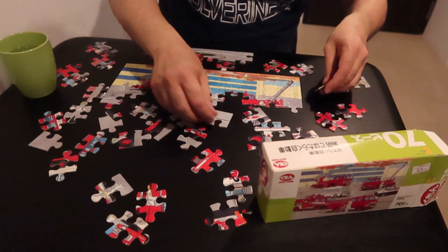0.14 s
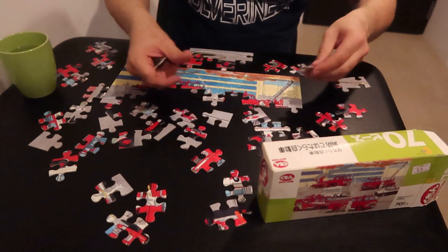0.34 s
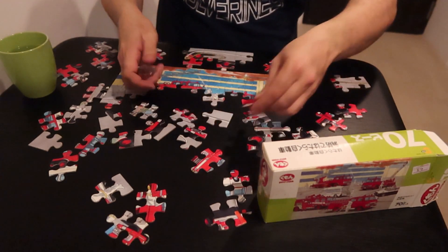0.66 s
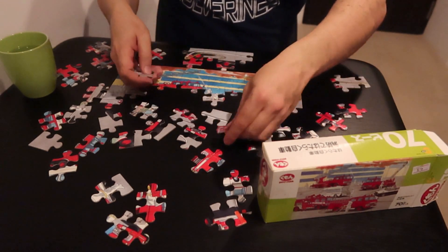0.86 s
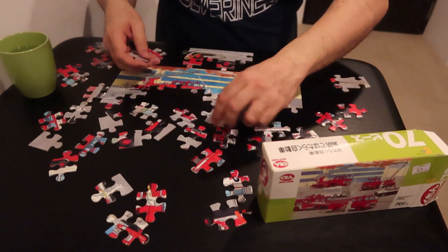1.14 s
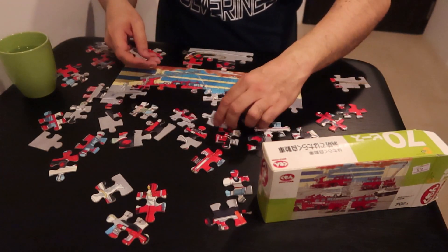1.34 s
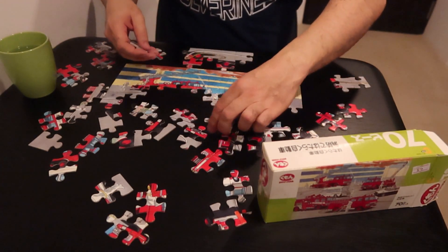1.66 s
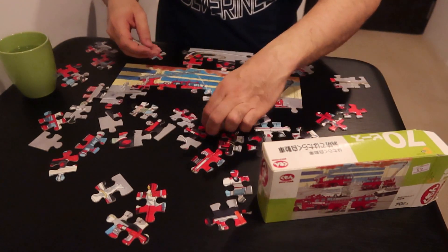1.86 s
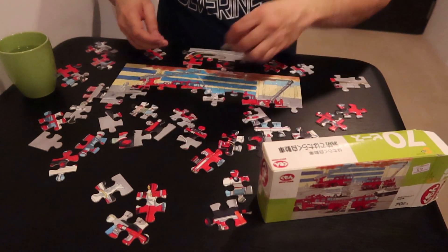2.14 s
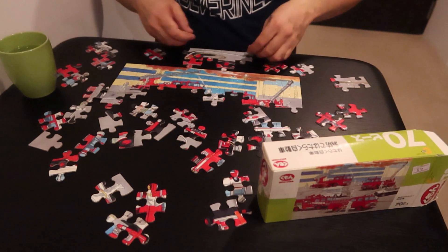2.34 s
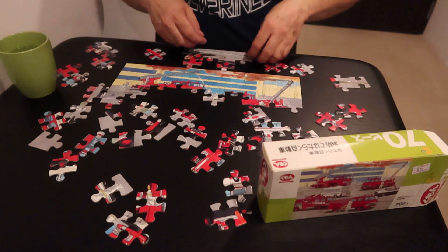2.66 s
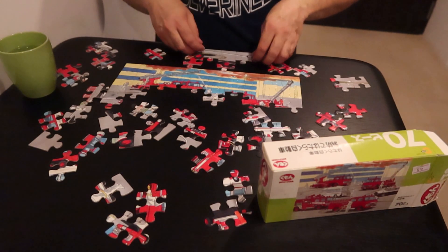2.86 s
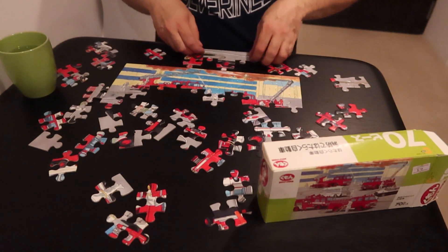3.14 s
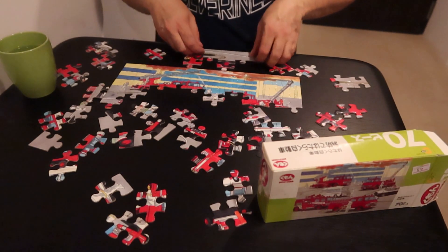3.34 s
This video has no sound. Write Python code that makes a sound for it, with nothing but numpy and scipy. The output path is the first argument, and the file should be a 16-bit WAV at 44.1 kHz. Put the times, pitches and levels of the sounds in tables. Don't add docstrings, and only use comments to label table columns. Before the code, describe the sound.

Cardboard puzzle pieces handled on a hard table: faint taps, a sharp snap, sparse clicks and brief scrapes, then a loudest closing snap; close, nearly mono microphone with light hiss in a small room.

```python
import sys
import numpy as np
from scipy import signal
from scipy.fft import rfft, irfft
from scipy.io import wavfile
from scipy.ndimage import uniform_filter1d

SR = 44100
rng = np.random.default_rng(int(sys.argv[2]) if len(sys.argv) > 2 else 0)


def boost_factor(decibels):
    exponent = np.asarray(decibels, float) / 20
    return 10 ** exponent


def digitize_waveform(pressure):
    field = np.atleast_2d(pressure).T
    bounded = np.clip(field, -1, 1)
    quanta = np.round(bounded * 32767).astype(np.int16)
    wavfile.write(sys.argv[1], SR, quanta)


N = 154350

# (frequency [Hz], level [dB per Hz])
HISS_COLOUR = [(30, -11), (60, -5), (250, -4.5), (520, -9.5), (1000, -9), (1190, -9.5), (1440, -12),
               (15800, -16)]
# (frequency [Hz], level [dB])
SIDE_HISS_COLOUR = [(60, -68), (180, -17.5), (550, -7.5), (1650, -7.5), (4970, -4), (15000, -9.5)]
# (frequency [Hz], width [Hz], rms level [dB])
RUMBLE_BANDS = [(28, 20, -93), (49.3, 20, -77.5), (97.3, 18, -67.5), (134, 41, -69), (174.8, 44, -66),
                (228, 180, -68.5), (357, 214, -70)]
# (time [s], level [dB], pitch [Hz], table thump [dB], table knock [dB])
SOFT_TAPS = [(0.047, -50, 1310, -73, -63), (0.058, -52, 1600, -77, -59), (.109, -57, 2400, -66, -53),
             (0.461, -50.5, 10400, -80, -78), (.51, -53, 3480, -84, -73), (0.9118, -43.5, 2040, -74, -52.5),
             (.968, -56, 1510, -57, -61), (1.3369, -47, 1300, -43.5, -58.5), (1.7035, -48, 1900, -42, -52),
             (1.785, -49.5, 1950, -67, -53), (1.845, -56, 1780, -74, -57), (2.4684, -55, 3300, -80, -48),
             (2.592, -48, 6770, -78, -77), (2.631, -59, 7500, -80, -65), (2.798, -54, 3400, -73, -59),
             (3.115, -49, 1680, -73, -63), (3.311, -46.5, 1940, -75, -51)]
# (frequency [Hz], level [dB], time to fall 60 dB [s])
THUMP_MODES = [(102.7, 2.5, 0.35), (149, -5.5, 0.31), (184, -1, 0.086)]
# (frequency [Hz], level [dB], time to fall 60 dB [s])
KNOCK_MODES = [(283, 2.5, 0.029), (375, 4.5, 0.083), (437, 6, 0.085), (475, 2, 0.11), (630.5, 1.5, 0.092),
               (747, 7.5, 0.052), (793, 5.5, 0.049)]
# (start [s], length [s], level [dB], pitch [Hz], width [Hz])
DRAGS = [(0.082, 0.05, -51.5, 1210, 1490), (0.19, 0.022, -52, 1200, 1500), (0.44, 0.038, -56, 10100, 1500),
         (.43, 0.038, -60.5, 2280, 600), (.49, 0.023, -57, 8950, 4000), (.86, 0.027, -61, 4000, 1200),
         (.855, .04, -60.5, 9500, 2500), (1.424, 0.083, -61, 7500, 5000), (1.778, .055, -51.5, 1020, 1450),
         (1.822, 0.045, -55, 970, 1490), (2.056, 0.03, -50, 4300, 700), (2.064, 0.022, -52, 6730, 700),
         (2.073, 0.022, -49, 950, 300), (2.0743, .018, -51, 1890, 500), (2.066, 0.021, -50, 10200, 5000),
         (2.62, 0.022, -48, 7500, 2570), (3.103, 0.016, -54, 8000, 6000)]
# (time [s], level [dB],
# pitch [Hz], width [Hz])
SHORT_TICKS = [(.0865, -53, 3200, 700), (.1105, -47, 5700, 500), (.112, -53, 4500, 500),
               (.128, -35, 2110, 250), (.1345, -32.5, 1230, 110), (.1345, -32.5, 2160, 400),
               (0.1408, -39, 1090, 300), (.912, -51, 800, 200), (.912, -48, 2300, 700),
               (.918, -48, 850, 350), (1.1056, -38, 3300, 1500), (1.1058, -40, 5600, 2000),
               (1.1085, -34, 1060, 260), (1.338, -52, 915, 300), (1.704, -53, 815, 300),
               (1.704, -55, 1800, 700), (1.7108, -50, 900, 400), (2.4688, -44.5, 1680, 350),
               (2.4695, -42.5, 754, 110), (2.488, -54, 560, 250), (2.5997, -38, 4800, 700),
               (2.5994, -38, 2500, 700), (2.9373, -42, 8000, 5000), (2.9452, -40, 3880, 900),
               (2.946, -41, 9500, 3000), (2.9505, -36.5, 750, 250), (3.3257, -29, 1900, 250),
               (3.326, -32, 448, 75), (3.3262, -23.5, 1474, 200), (3.331, -27, 7100, 1500),
               (3.3365, -34, 1440, 110), (3.3356, -32, 8560, 3000), (3.339, -30, 6500, 2000),
               (3.344, -28, 686, 250)]
# (time [s], thin edge [dB], whole piece [dB])
SLIP_JERKS = [(2.0622, -53, -68), (2.0658, -44, -58), (2.0683, -40, -50), (2.0712, -37, -47),
              (2.0727, -37, -53), (2.0745, -38, -42), (2.076, -36, -33.5), (2.0775, -36, -37.5),
              (2.0786, -35.5, -33.5), (2.0799, -36.5, -37.5), (2.0826, -41, -43), (2.0843, -48, -45)]
# (frequency [Hz], width [Hz], level [dB])
EDGE_RINGS = [(4220, 480, 1), (5370, 600, -2), (6700, 460, -8.5), (7900, 700, -8.5), (11900, 2000, -7.5)]
# (frequency [Hz], width [Hz], level [dB])
BODY_RINGS = [(994, 250, -2), (1900, 460, 0.1), (2870, 460, -4)]
# (time [s], peak [dB], table thump [dB], table knock [dB], chatter length [s])
LOUD_SNAPS = [
    (0.1273, -30, -18.5, -12, 0.0035),
    (1.1021, -32.5, -16, -12.5, .006),
    (2.078, -43, -15, -30, 0.0084),
    (2.599, -30, -39, -27, 0.0069),
    (2.9301, -27, -19, -13, 0.00684),
    (3.3245, -14, -19.5, -19.5, 0.0024),
]
# (frequency [Hz], width [Hz], level [dB])
SNAP_RINGS = [
    [(1230, 52, -2.5), (1860, 260, 4.5), (3390, 160, -4), (4750, 560, 5), (5700, 820, 6), (9170, 530, -4)],
    [(1060, 240, 10), (2120, 1200, 5.5), (3800, 580, -10), (8260, 870, -1), (12600, 540, -6)],
    [(980, 83, 8), (1900, 130, -2), (3870, 460, 1), (5400, 400, 3)],
    [(2270, 130, -3.5), (4800, 170, 0.5), (7500, 500, 8), (9900, 460, -20)],
    [(758, 96, 6), (3780, 420, 1), (6030, 550, 5), (8250, 320, -2), (9500, 800, 2), (12700, 470, -1)],
    [(770, 110, 1), (1620, 230, 6), (3840, 600, 2), (7270, 900, 1.5), (9150, 1450, 8.5), (11300, 2100, 2)],
]
# (frequency [Hz], level [dB per Hz])
SNAP_CRACKS = [
    [(290, -26), (450, -2), (750, -5), (1200, -2), (2300, -7), (7480, -8.5), (14000, -29)],
    [(200, -14), (450, -8), (750, -14), (1100, -3), (1800, -6.5), (3800, -13.5), (5000, -20), (14000, -25)],
    [(350, -36), (800, -12), (1940, -6), (2430, -1), (5180, -13), (15000, -22)],
    [(710, -45), (1200, -16), (2950, -5.5), (4000, -13.5), (7550, -2.5), (15000, -22)],
    [(240, -21), (400, -12.5), (1660, -14), (2400, -14.5), (9660, -16), (15000, -35)],
    [(240, -32), (450, 2.5), (580, -6), (780, -7), (1100, -1.5), (1450, -5), (4200, -1.5), (9500, -0.5),
     (16000, -28)],
]
CRACK_TO_ROOM_DB = [0.32, 0.47, -1, -0.26, 0.5, 0.62]
# (delay [s], level [dB])
FIRST_ECHOES = [(.0064, -9), (0.0106, -12.5), (0.0139, -11.5)]
# (frequency [Hz], time to fall 60 dB [s])
ROOM_DECAY = [(150, 0.6), (500, 0.29), (1500, 0.3), (4000, 0.22), (8000, 0.25), (14000, 0.15)]
# (frequency [Hz], level [dB])
ROOM_TONE = [(200, -2), (800, 0), (14000, 1)]

HISS_DB, HISS_EDGE_HZ = -56.5, 15900
TAP_S, TAP_RISE_S = 0.0045, 0.0004
TAP_WIDTH = 0.45
TAP_LOWER, TAP_LOWER_DB = 0.52, 1.5
THUMP_RISE_S, KNOCK_RISE_S = 0.0033, 0.004
GRIT_PER_S, GRIT_DB = 4000, 2.5
SNAP_RISE_S = 0.000231
CRACK_SHARE = 0.683
CRACK_DIRECT_DB = -0.5
ROOM_DB, ROOM_RISE_S, SIDE_ROOM_DB = -3, 0.0054, -51
ECHO_HZ = 13000
KNOCK_TO_ROOM_DB, TICK_TO_ROOM_DB, SCRAPE_TO_ROOM_DB, RING_TO_ROOM_DB = -3.5, -8.5, -5, -7
LOW_HZ, EDGE_HZ = 62, 16250
OFFSET = 0.0012
PUSH = np.hanning(30) / 15


def evened(x):
    return x / np.sqrt(np.mean(x ** 2) + 1e-20)


def peaked(x, db):
    return boost_factor(db) * x / np.sqrt(uniform_filter1d(x ** 2, size=44).max())


def read(points, hz):
    f, value = np.transpose(points)
    return np.interp(np.log(hz + 1), np.log(f + 1), value)


def add(mix, s, sound):
    part = mix[round(s * SR):][:len(sound)]
    part += sound[:len(part)]


def ring(x, hz, width):
    r = np.exp(-np.pi * width / SR)
    return 2 * signal.lfilter([1 - r], [1, -r * np.exp(2j * np.pi * hz / SR)], x).real


def steep(x, hz, width):
    return ring(ring(x, hz, width), hz, 2 * width)


def ring_set(blow, rings):
    return sum(boost_factor(db) * peaked(steep(blow, hz, width), 0) for hz, width, db in rings)


def chatter(rise, length):
    t = np.arange(2048) / SR
    shape = (1 - np.exp(-t / rise)) ** 2 * np.exp(-t / length * 2)
    x = rng.standard_normal(2048) * shape
    for _ in range(6):
        z = rfft(x)
        x = irfft(z / abs(z))
        x = x * shape / np.sqrt(uniform_filter1d(x ** 2, size=12) + 1e-12)
    return x


def hiss():
    hz = np.fft.rfftfreq(2048, 1 / SR)
    a, b, c, d, patches = rng.standard_normal((N // 512 + 5, 1025, 5)).T
    patches = uniform_filter1d(patches, size=6, axis=0)
    patches = evened(uniform_filter1d(patches, size=8, axis=1))
    mid = a + 1j * b
    side = (c + 1j * d) * boost_factor(read(SIDE_HISS_COLOUR, hz))[:, None]
    z = np.array([mid, side]) * boost_factor(read(HISS_COLOUR, hz)[:, None] + 0.13 * patches)
    z = z * (hz < HISS_EDGE_HZ)[:, None]
    x = signal.istft(z, nperseg=2048, noverlap=1536)[1][:, :N]
    return boost_factor(HISS_DB) * x / np.std(x[0])


def rumble():
    x = np.zeros((2, N))
    for hz, width, db in RUMBLE_BANDS:
        noise = rng.standard_normal((2, N))
        x += boost_factor(db) * evened(ring(ring(noise, hz, width), hz, width))
    return x * boost_factor([[0], [-24]])


def soft_taps():
    taps, thumps, knocks = np.zeros((3, N))
    for s, db, hz, thump_db, knock_db in SOFT_TAPS:
        drive = chatter(TAP_RISE_S, TAP_S)
        upper = steep(drive, hz, TAP_WIDTH * hz)
        lower = steep(drive, TAP_LOWER * hz, TAP_WIDTH * hz / 2)
        add(taps, s, peaked(upper + boost_factor(TAP_LOWER_DB) * lower, db))
        add(thumps, s, boost_factor(thump_db) * PUSH)
        add(knocks, s, boost_factor(knock_db) * PUSH)
    return taps, thumps, knocks


def table(blows, modes, rise):
    t = np.arange(SR // 2) / SR
    rung = sum(boost_factor(db - 60 * t / t60) * np.sin(2 * np.pi * hz * t) for hz, db, t60 in modes)
    return signal.fftconvolve(blows, rung * (1 - np.exp(-t / rise)))[:N]


def scrapes():
    out = np.zeros(N)
    for s, length, db, hz, width in DRAGS:
        progress = np.minimum(np.arange(6000) / SR / length, 1)
        swell = np.sin(np.pi * progress ** 1.4)
        hits = rng.random(6000) < GRIT_PER_S / SR
        force = boost_factor(GRIT_DB * np.minimum(rng.exponential(1, 6000), 3))
        grit = rng.standard_normal(6000) * (0.3 + hits * force)
        add(out, s, boost_factor(db) * evened(steep(grit, hz, width)) * swell)
    return out


def ticks():
    out, blow = np.zeros(N), np.eye(1, 2048)[0]
    edge, body = ring_set(blow, EDGE_RINGS), ring_set(blow, BODY_RINGS)
    for s, edge_db, body_db in SLIP_JERKS:
        add(out, s, peaked(edge, edge_db) + peaked(body, body_db))
    for s, db, hz, width in SHORT_TICKS:
        add(out, s, peaked(steep(blow, hz, width), db))
    return out


def click(shape):
    hz = abs(np.fft.fftfreq(2048, 1 / SR))
    log_gain = np.log(boost_factor(np.maximum(read(shape, hz), -60)))
    return np.fft.ifft(np.exp(np.conj(signal.hilbert(log_gain)))).real[:1024]


def snaps():
    out, cracks, thrown, thumps, knocks = np.zeros((5, N))
    for snap, rings, crack, room_db in zip(LOUD_SNAPS, SNAP_RINGS, SNAP_CRACKS, CRACK_TO_ROOM_DB):
        s, db, thump_db, knock_db, length = snap
        body = ring_set(chatter(SNAP_RISE_S, length), rings)
        add(out, s, peaked(body, db))
        burst = np.convolve(chatter(SNAP_RISE_S, CRACK_SHARE * length), click(crack))
        burst = peaked(burst, db)
        add(cracks, s, burst)
        add(thrown, s, boost_factor(room_db) * burst)
        add(thumps, s, boost_factor(db + thump_db) * PUSH)
        add(knocks, s, boost_factor(db + knock_db) * PUSH)
    return out, cracks, thrown, thumps, knocks


def room(x):
    reflections = np.zeros((2, SR // 2))
    slots = np.arange(200, SR // 2 - 20, 16)
    at = slots + rng.integers(0, 16, (2, len(slots)))
    np.put_along_axis(reflections, at, rng.choice([-1., 1.], at.shape), 1)
    hz, t, z = signal.stft(reflections, SR, nperseg=256)
    fall_db = 60 * t / read(ROOM_DECAY, hz)[:, None]
    tail = signal.istft(z * boost_factor(read(ROOM_TONE, hz)[:, None] - fall_db), SR, nperseg=256)[1]
    z = rfft(tail)
    power = abs(z) ** 2
    z = z * np.sqrt(uniform_filter1d(power, size=500) / uniform_filter1d(power, size=40))
    tail = irfft(z, tail.shape[1])
    tail = tail * (1 - np.exp(-np.arange(tail.shape[1]) / SR / ROOM_RISE_S)) ** 2
    tail = boost_factor(ROOM_DB) * tail / np.linalg.norm(tail[0])
    for s, db in FIRST_ECHOES:
        tail[:, round(s * SR):][:, :31] += boost_factor(db) * signal.firwin(31, ECHO_HZ, fs=SR)
    return signal.fftconvolve(x[None], tail, axes=1)[:, :N]


def scene():
    taps, tap_thumps, tap_knocks = soft_taps()
    rings, cracks, thrown, snap_thumps, snap_knocks = snaps()
    grit, tick = scrapes(), ticks()
    thump = table(tap_thumps + snap_thumps, THUMP_MODES, THUMP_RISE_S)
    knock = table(tap_knocks + snap_knocks, KNOCK_MODES, KNOCK_RISE_S)
    direct = taps + knock + tick + grit + rings + boost_factor(CRACK_DIRECT_DB) * cracks + thump
    to_walls = taps + thrown + boost_factor(KNOCK_TO_ROOM_DB) * knock + boost_factor(TICK_TO_ROOM_DB) * tick
    to_walls += boost_factor(SCRAPE_TO_ROOM_DB) * grit + boost_factor(RING_TO_ROOM_DB) * rings
    mid, side = room(to_walls) * boost_factor([[0], [SIDE_ROOM_DB]])
    low_cut = signal.butter(2, LOW_HZ, "high", fs=SR, output="sos")
    heard = signal.sosfilt(low_cut, [direct + mid, side])
    mid, side = heard + hiss() + rumble()
    return np.array([mid + side, mid - side])


def band_limit(x):
    return signal.sosfilt(signal.butter(12, 16660, fs=SR, output="sos"), x)


def record(dry):
    edged = signal.oaconvolve(dry, signal.firwin(255, EDGE_HZ, fs=SR)[None], "same")
    return band_limit(edged + OFFSET)


dry = scene()
out = record(dry)
digitize_waveform(out)
```